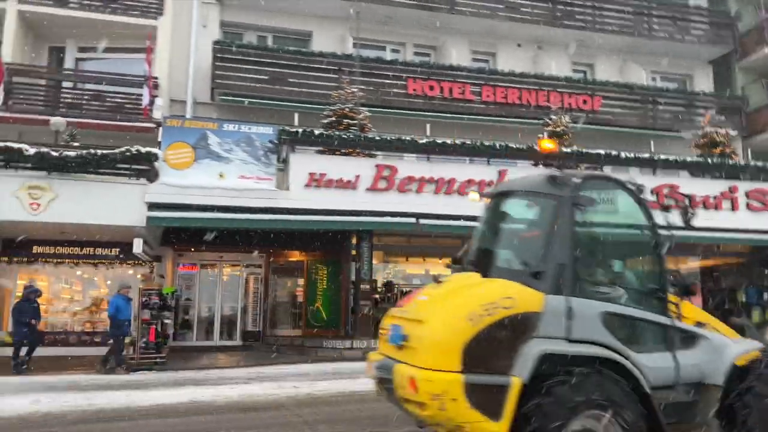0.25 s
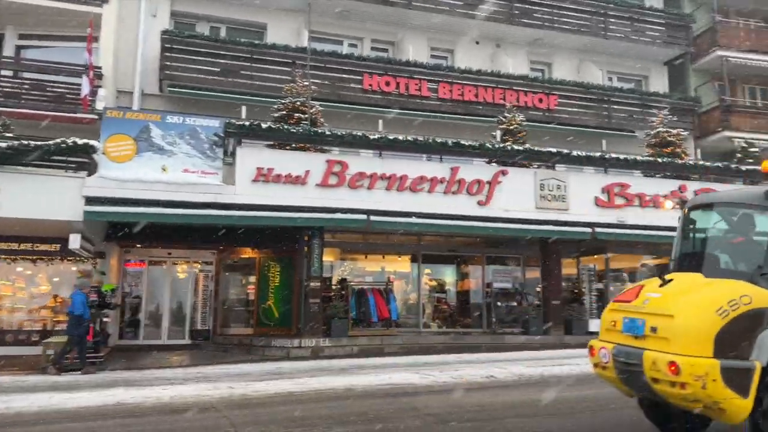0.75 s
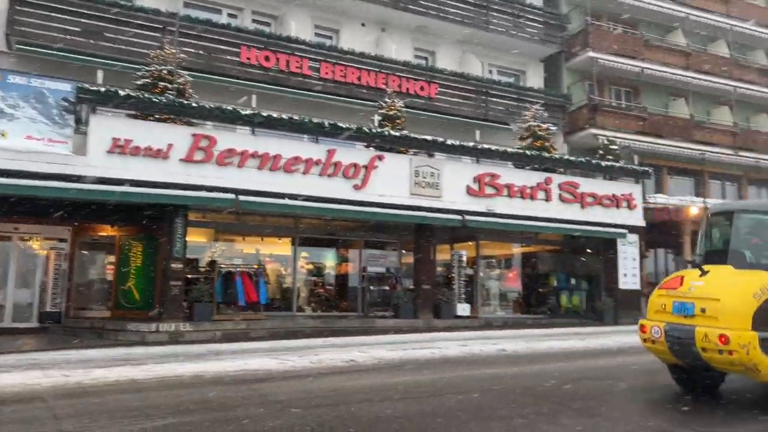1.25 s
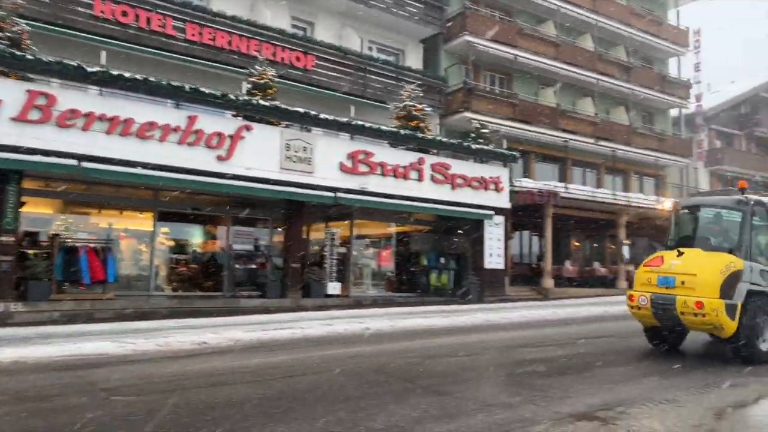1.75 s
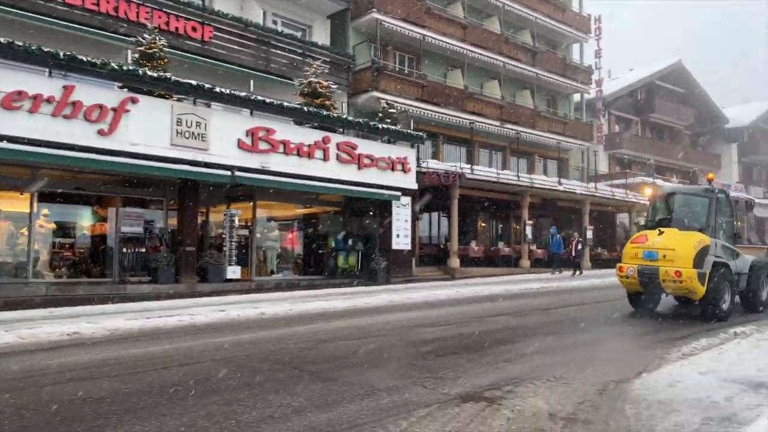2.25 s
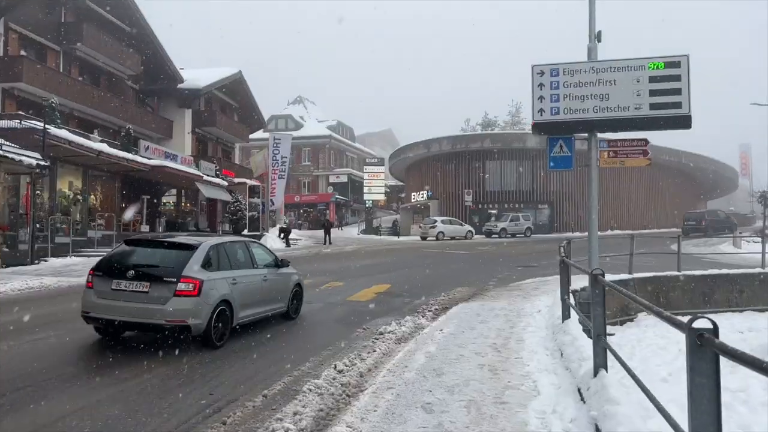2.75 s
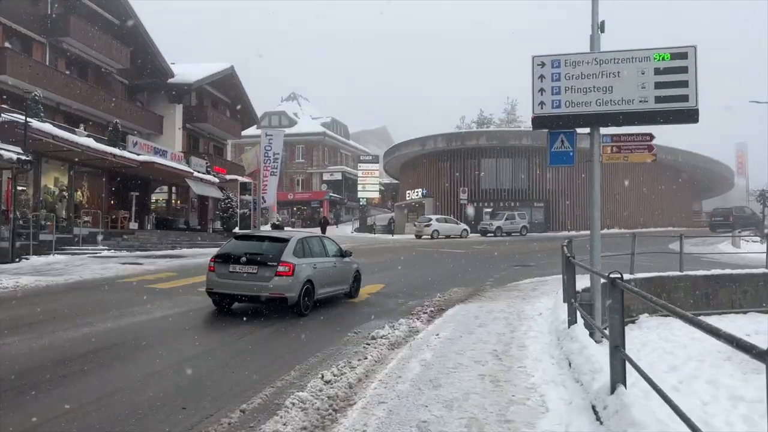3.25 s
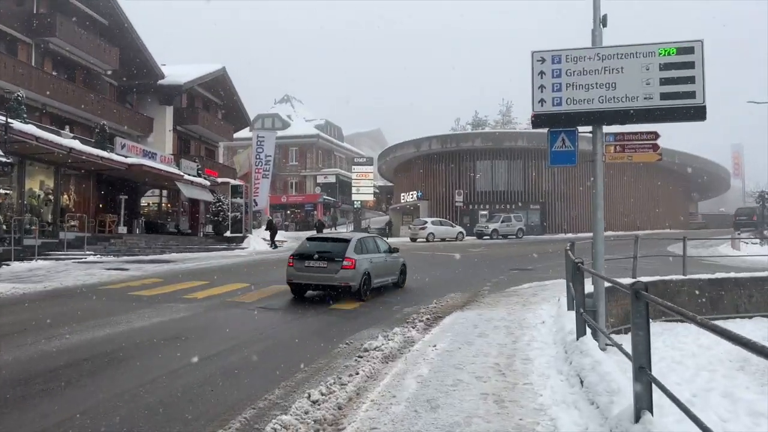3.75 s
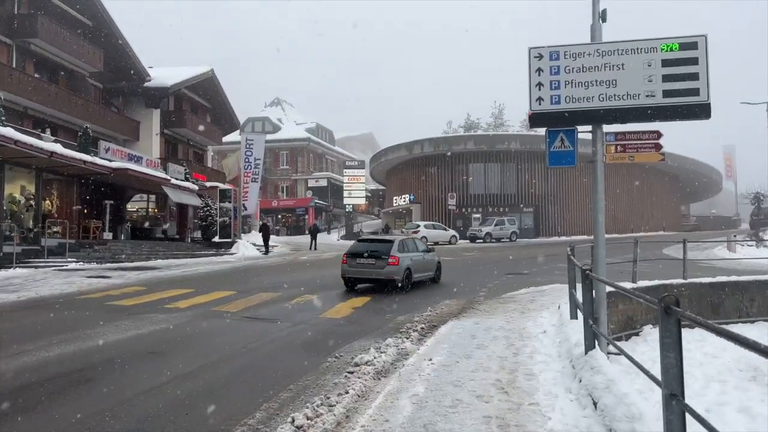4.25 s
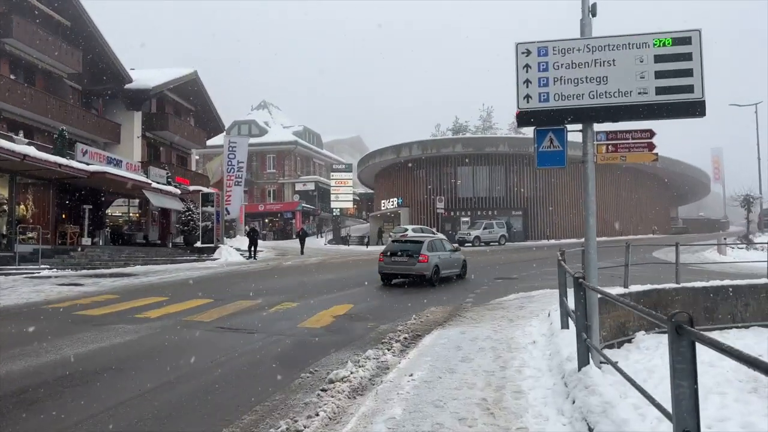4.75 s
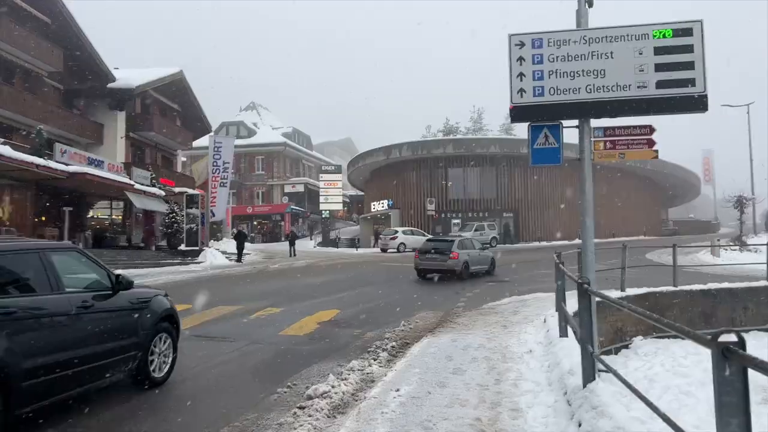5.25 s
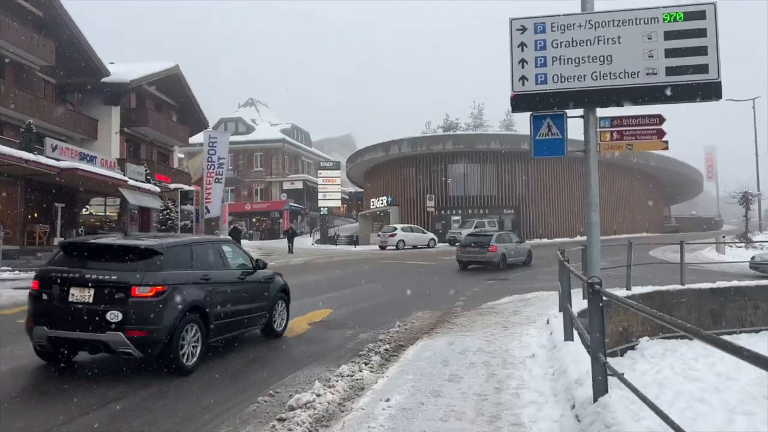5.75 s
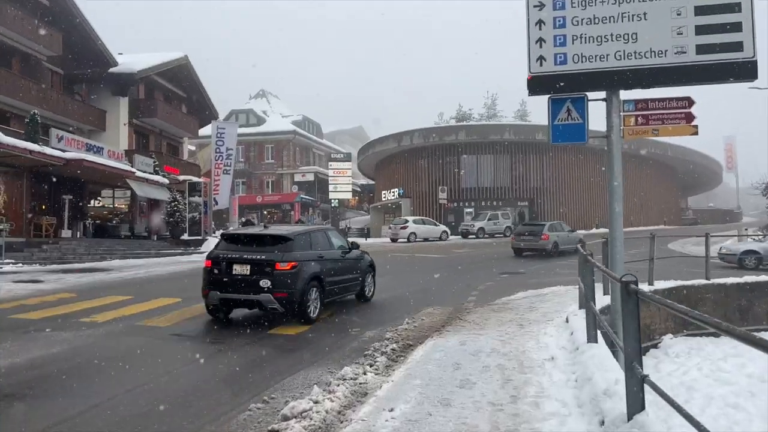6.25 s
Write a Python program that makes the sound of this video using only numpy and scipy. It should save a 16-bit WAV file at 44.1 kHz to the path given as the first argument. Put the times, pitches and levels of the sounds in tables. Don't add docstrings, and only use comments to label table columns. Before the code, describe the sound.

On a wet, slushy town street, a small diesel loader rolls past close to the microphone, with a steady low firing drone, rough casing roar, clatter and a thin high whistle, drawing off to the right. The scene cuts abruptly: one car moves away while another comes from the left, its tyres rushing and spraying over the wet road. A low diesel drone and far traffic rumble stay underneath. Handheld stereo phone at the kerb.

```python
import sys
import numpy as np
from scipy import signal
from scipy.io import wavfile
from scipy.ndimage import uniform_filter1d, map_coordinates

SR = 44100
rng = np.random.default_rng(int(sys.argv[2]) if len(sys.argv) > 2 else 0)


def linear_from_db(decibels):
    return 10 ** (np.asarray(decibels, float) / 20)


def generate_wav(signal):
    frames = np.transpose(np.atleast_2d(signal))
    scaled = np.clip(frames, -1, 1) * 32767
    pcm = np.round(scaled).astype(np.int16)
    wavfile.write(sys.argv[1], SR, pcm)


N = 285768
TIME = np.arange(N) / SR
CUT_S = 2.3235


def unit(x):
    return x / np.sqrt(np.mean(x ** 2) + 1e-20)


def curves(rows, t=TIME):
    s, *cols = np.transpose(rows)
    return [np.interp(t, s, c) for c in cols]


def along(points, hz):
    f, *cols = np.transpose(points)
    return [np.interp(np.log(hz + 1), np.log(f + 1), c) for c in cols]


def wobble(rate):
    knots = rng.standard_normal(int(N * rate / SR) + 4)
    return map_coordinates(knots, [TIME * rate])


# frequency in Hz, share kept of the path difference [0-1].
DIRECTION_KEPT = [(250, 0), (600, 1), (4800, 0.97), (6200, 0.028)]


def rush(spectrum, ports, lag, patchy_db, excite=1, size=512, blur=0 * TIME):
    hz, t, z = signal.stft(rng.standard_normal((3, N)) * excite, SR, nperseg=size)
    patches = uniform_filter1d(rng.standard_normal(z.shape[1:]), size=6, axis=0)
    patches = unit(uniform_filter1d(patches, size=12, axis=1))
    lean_db, turn, alike = (c[:, None] for c in along(ports, hz))
    kept = along(DIRECTION_KEPT, hz)[0]
    alike = np.clip(alike * (1 - kept[:, None] * np.interp(t, TIME, blur)), 0, 1)
    travel = 2 * np.pi * (hz * kept)[:, None] * np.interp(t, TIME, lag) / SR
    half = np.exp(.5j * (turn - travel))
    shared = np.array([half, 1 / half]) * z[2]
    pair = np.sqrt(alike) * shared + np.sqrt(1 - alike) * z[:2]
    pair = pair * linear_from_db(np.array([lean_db, -lean_db]) / 2)
    colour = linear_from_db(along(spectrum, hz)[0][:, None] + patchy_db * patches)
    return unit(signal.istft(pair * colour, SR, nperseg=size)[1][:, :N])


# time in seconds, level in dB, second order in dB.
FIRING_TONE = [
    [(0.0, -28, -36.5), (0.2, -26.5, -51), (0.4, -26.5, -56), (0.6, -27, -36), (0.8, -29, -38),
     (1.0, -28.5, -40.3), (1.2, -29.6, -38.0), (1.4, -27, -39), (1.6, -28.5, -40.5), (1.8, -27, -37.2),
     (2.0, -29.5, -37.5), (2.12, -31.7, -35.5), (2.22, -33.5, -42.9), (2.32, -32.5, -50)],
    [(2.33, -20.5, -46), (2.4, -22, -41), (2.5, -27, -42), (2.65, -24, -39), (2.8, -26, -41),
     (2.95, -27.5, -40), (3.1, -25.5, -46), (3.25, -27.5, -41), (3.4, -25.5, -55.0), (3.55, -25, -40),
     (3.7, -25.5, -43), (3.85, -25.0, -48.5), (4.0, -26.5, -43), (4.15, -23.5, -47), (4.3, -25.4, -37),
     (4.45, -24, -39.1), (4.6, -31, -39), (4.75, -31, -49), (4.9, -34, -56), (5.05, -37, -40),
     (5.2, -42.5, -40.9), (5.35, -39.7, -43), (5.5, -36.5, -41.5), (5.65, -36.5, -39.5), (5.8, -38, -38),
     (5.95, -31.9, -38), (6.1, -31.5, -41), (6.25, -34, -43.1), (6.4, -29, -44), (6.48, -34.5, -48.0)],
]
# time in seconds, order 4.5 of firing in dB, order 9 in dB.
PUMP_LINES = [(0, -28.5, -51), (.25, -45, -52), (.5, -37, -52), (.7, -49.5, -51), (1.2, -47.5, -55),
              (1.4, -40, -56.5), (1.8, -46, -54), (2.1, -50, -64), (2.6, -47.5, -61), (3.4, -46.5, -65),
              (3.8, -43, -62), (4.1, -49.5, -63), (5, -49, -62), (5.8, -50.5, -65), (6.2, -47, -62),
              (6.48, -46, -64)]


def diesel():
    firing_hz = 71.75
    first_db, second_db = np.where(TIME < CUT_S, curves(FIRING_TONE[0]), curves(FIRING_TONE[1]))
    phase = 2 * np.pi * firing_hz * TIME + .25 * wobble(5) + .12 * wobble(25)
    tone = linear_from_db(first_db + 0.58 * wobble(20)) * np.sin(phase)
    second_level = linear_from_db(second_db + 2.0 * wobble(15))
    tone = tone + second_level * np.sin(2 * phase + 1.2 + 0.18 * wobble(12))
    for order, line_db in zip((4.5, 9), curves(PUMP_LINES)):
        level = linear_from_db(line_db + 1.5 * wobble(9))
        tone = tone + level * np.sin(order * phase + 0.46 * wobble(12))
    return np.sqrt(2) * tone, phase


# time in seconds, casing in dB, clatter in dB, turbo whistle in dB.
LOADER_PASS = [(0.0, -26, -27.5, -31), (0.2, -27.5, -30, -28.5), (0.4, -27, -30.5, -32.5),
               (0.6, -27.5, -30.5, -37.5), (0.8, -29, -32, -32.5), (1.0, -28.5, -33, -45.5),
               (1.2, -29.5, -33, -39), (1.4, -31, -34.5, -37.5), (1.6, -32.5, -34, -42.5),
               (1.8, -32.5, -35.5, -38.5), (2.0, -33, -34.5, -43.5), (2.15, -34, -36, -43.5),
               (2.25, -36, -36.5, -38), (2.32, -33, -36.5, -38.5)]
# time in seconds, samples by which left lags.
LOADER_LAG = [
    (0, 1.5),
    (.3, 1.5),
    (.7, 5.5),
    (1.5, 6),
    (2.32, 6),
]
# frequency in Hz, level in dB per Hz.
CASING_HZ = [(120, 1), (200, -2), (360, -2.5), (440, 2), (520, -3.5), (600, -4), (830, -5.5), (1000, -4),
             (1500, -13), (2500, -43)]
# frequency in Hz, level in dB per Hz.
CLATTER_HZ = [(700, -25), (1300, 0), (1900, -1), (2800, -4.5), (4000, -7), (5500, -7.5), (8500, -8),
              (9700, -10.5), (10400, -8), (11500, -9.5), (11900, -62)]
# frequency in Hz, level in dB per Hz.
TURBO_HZ = [(9000, -19), (9900, -7.5), (10400, -1.5), (10900, 10), (11300, 6), (11700, -15.5), (11900, -60)]
# frequency in Hz, level in dB per Hz.
GEARS_HZ = [(720, -38.5), (795, -6), (822, 5.5), (850, -5), (930, -41.5)]
# frequency in Hz, left-right in dB, phase of left in rad, likeness [0-1].
LOADER_AT_PORTS = [(224, -3, 1.5, 1), (332, 0, 0.1, 0.45), (481, -3, -1.2, 0.77), (690, -11.5, -2, .55),
                   (880, -12, 0.9, .45), (1320, -5.5, -1, .6), (1880, -3, 0.5, 0.51),
                   (2910, -4.5, -0.45, 0.6), (3550, -2.5, 0.2, .6), (4540, -1.5, 0.5, .55),
                   (5470, -1, -1.5, 0.9), (6330, -3.5, -1.5, 0.9), (6950, -3, 1, 0.72),
                   (8460, 2.5, 1, 0.37), (9110, -4, -3, 0.92), (10010, -2, -3.5, .9), (11340, 2, -3, .75)]


def loader(phase):
    casing_db, clatter_db, turbo_db = curves(LOADER_PASS)
    lag, = curves(LOADER_LAG)

    def firing(depth):
        return 1 + depth * np.cos(phase + 0.98) * linear_from_db(2.8 * wobble(29.9))

    def noise(spectrum, patchy_db, **how):
        return rush(spectrum, LOADER_AT_PORTS, lag, patchy_db, **how)

    casing = linear_from_db(casing_db) * noise(CASING_HZ, 1.5, excite=firing(0.13))
    clatter = linear_from_db(clatter_db) * noise(CLATTER_HZ, 2.0, excite=firing(0.086))
    turbo = linear_from_db(turbo_db + 4.2 * wobble(25)) * noise(TURBO_HZ, 1.5, excite=firing(0.074))
    gears = linear_from_db(-40 - 1.1 * TIME + 2.0 * wobble(4)) * noise(GEARS_HZ, 1.0, size=2048)
    return (casing + gears + clatter + turbo) * (TIME < CUT_S)


# time in seconds, level in dB.
FAR_TRAFFIC = [
    [(0, -33), (.5, -36.5), (1, -37), (1.5, -41), (2.1, -38), (2.32, -44)],
    [(2.33, -32), (2.6, -34), (3, -34), (3.4, -35), (3.8, -36), (4.2, -33.5), (4.6, -33.5), (5, -34),
     (5.4, -34), (5.8, -35.5), (6.2, -36), (6.48, -36)],
]
# frequency in Hz, level in dB per Hz.
RUMBLE_HZ = [(15, -21.5), (30, -7.5), (55, -4), (100, 0), (200, -2), (330, -4), (480, -4.5), (800, -16.5),
             (2000, -28.5), (6000, -17), (11900, -62)]
# frequency in Hz, left-right in dB, phase of left in rad,
# likeness [0-1].
ROAD_AT_PORTS = [(219, 0, 0, 0.98), (333, 0.5, 0.5, 0.76), (483, -2, 0.5, .4), (922, -2, 0, .75),
                 (1398, -2.5, -0.49, .88), (1920, -2.5, 0, 0.85), (2780, -3, 0, .7), (3560, -1, .5, 0.67),
                 (4360, 0, 0, .5), (5560, 4.5, 0.5, 0.27), (7200, 0, 0.5, 0.57), (8580, 1, 0, 0.62),
                 (8970, -0.5, -3.5, .96), (11600, 1.5, -2.5, .93)]


def street():
    level_db = np.where(TIME < CUT_S, curves(FAR_TRAFFIC[0])[0], curves(FAR_TRAFFIC[1])[0])
    return linear_from_db(level_db) * rush(RUMBLE_HZ, ROAD_AT_PORTS, 0 * TIME, patchy_db=0.8, size=2048)


# time in seconds, tyre level in dB, left lag in samples.
LEAVING_CAR = [(2.33, -28, -8.5), (2.6, -28.5, -7.5), (2.9, -30, -6), (3.2, -31, -6), (3.5, -31.5, -4),
               (4, -36, -4.5), (5, -32, -2), (6.48, -40, -2.5)]
# frequency in Hz, level in dB per Hz.
WET_TYRES_HZ = [(400, -14), (700, -4.5), (900, 0.5), (1300, -2.5), (1900, 0.5), (2800, 0.5), (4000, -4.5),
                (5500, -7.5), (7000, -13), (9700, -11), (11500, -19), (11900, -70)]
# time in seconds, tread roar in dB, spray in dB, left lag in samples.
COMING_CAR = [(2.33, -45.5, -43.5, -24), (3, -36.5, -43.5, -20), (3.4, -38.5, -37, -17),
              (3.7, -31, -30, -18), (4, -31, -29, -19), (4.3, -27, -26.5, -17.5), (4.5, -30, -26, -16.5),
              (4.7, -29, -26, -14.5), (4.9, -28.5, -27, -14.5), (5.1, -27.5, -27.5, -12),
              (5.3, -31, -29.5, -11.5), (5.5, -28.5, -29.5, -11), (5.7, -29.5, -29.5, -5.5),
              (5.9, -32.5, -32.5, -3.5), (6.1, -32.5, -33.5, -5.5), (6.3, -33, -33.5, -2),
              (6.48, -35, -33.5, -3.5)]
# frequency in Hz, level in dB per Hz.
TREAD_HZ = [(400, -27), (700, -4), (950, -1.5), (1300, 2.5), (1900, -7), (2800, -16.5), (5000, -46.5)]
# frequency in Hz, level in dB per Hz.
SPRAY_HZ = [(900, -28.5), (1900, -3), (2800, 1.5), (4000, -1.5), (5500, -5.5), (7000, -10.5), (8500, -12),
            (9500, -14.5), (10800, -12.5), (11500, -20.5), (11900, -73)]
# time in seconds, share heard off the house fronts [0-1].
HOUSE_ECHO = [(2.33, .2), (3.9, 0.21), (4.2, .05), (4.6, 0.0018), (4.8, .1), (5.1, .3), (5.7, .4),
              (6, 0.11), (6.48, 0.21)]
# time in seconds, level in dB.
KERB_SLUSH = [
    (2.33, -58),
    (3.2, -50),
    (3.45, -42),
    (3.7, -38.5),
    (4, -37.5),
    (4.3, -42.5),
    (4.7, -50),
    (6.48, -61.5),
]
# frequency in Hz, level in dB per Hz.
SLUSH_HZ = [(4000, -31.5), (5200, -4), (6300, 0), (7500, -5.5), (9000, -13.5), (10000, -40)]
# frequency in Hz, left-right in dB, phase of left in rad, likeness [0-1].
KERB_AT_PORTS = [(3980, 10.5, 0.034, 0.1), (7000, 9.5, 0.026, .3), (9000, 3, 0.016, 0)]


def cars():
    leaving_db, leaving_lag = curves(LEAVING_CAR)
    tread_db, spray_db, lag = curves(COMING_CAR)
    echo, = curves(HOUSE_ECHO)
    slush_db, = curves(KERB_SLUSH)

    def drops(size_db):
        return linear_from_db(size_db * wobble(700) + 0.34 * wobble(9))

    first = rush(WET_TYRES_HZ, ROAD_AT_PORTS, leaving_lag, patchy_db=2.3, excite=drops(1.06))
    tread = rush(TREAD_HZ, ROAD_AT_PORTS, lag, patchy_db=1.7, excite=drops(1.0), blur=echo)
    spray = rush(SPRAY_HZ, ROAD_AT_PORTS, lag, patchy_db=1.75, excite=drops(1.35), blur=echo)
    slush = rush(SLUSH_HZ, KERB_AT_PORTS, lag, patchy_db=1.5, excite=drops(1.2))
    tyres = linear_from_db(leaving_db) * first + linear_from_db(tread_db) * tread + linear_from_db(spray_db) * spray
    return (tyres + linear_from_db(slush_db) * slush) * (TIME >= CUT_S)


# time in seconds, firing rate in Hz, level in dB.
LEAVING_ENGINE = [(2.33, 49, -42), (2.6, 49.9, -42), (2.8, 49.84, -40), (2.95, 51.8, -27.5),
                  (3.1, 50.75, -34.5), (3.25, 51.3, -37), (3.4, 51.06, -33), (3.6, 50.6, -35),
                  (3.8, 51.27, -30.5), (4.05, 51.15, -26), (4.3, 51.95, -37), (4.6, 52.2, -34),
                  (4.9, 53, -34.5), (5.3, 52.5, -39), (5.6, 53, -38), (5.9, 53.75, -29.5),
                  (6.2, 54.66, -34), (6.48, 53.8, -37)]
# time in seconds, third order in dB.
LOAD_GROWL = [(2.33, -54), (3.1, -52), (3.25, -37.5), (3.45, -40), (3.7, -47), (4.2, -47), (4.6, -56),
              (6.48, -65)]
# time in seconds, firing rate in Hz, level in dB, second order in dB,
# exhaust boom in dB.
COMING_ENGINE = [(2.33, 54.7, -62, -60, -56), (3.5, 54, -47, -59, -48), (3.9, 54.35, -34, -42, -44),
                 (4.15, 54.2, -41.5, -40.5, -49), (4.3, 52.8, -44, -39, -41), (4.45, 53.85, -47, -40, -48),
                 (4.6, 54.95, -41, -42, -34), (4.75, 55.2, -34, -36.5, -42), (4.9, 55.9, -40, -34, -33.5),
                 (5.05, 56.6, -36, -39.5, -32.5), (5.25, 57.4, -34, -34.5, -30),
                 (5.4, 57.6, -42, -36.5, -41), (5.6, 58.2, -37.5, -38.5, -41), (5.8, 58.3, -34, -38, -36.5),
                 (6, 58.6, -40, -39, -47), (6.2, 59.1, -36, -37, -37.5), (6.48, 58.2, -34.5, -42, -48.5)]
# frequency in Hz, level in dB per Hz.
BOOM_HZ = [(150, -38), (190, -0.5), (207, 0), (222, -0.5), (270, -38)]


def engines():
    hz, first_db = curves(LEAVING_ENGINE)
    growl_db, = curves(LOAD_GROWL)
    phase = 2 * np.pi * np.cumsum(hz) / SR + 0.17 * wobble(11)
    first = linear_from_db(first_db + 1.2 * wobble(16)) * np.sin(phase) + linear_from_db(growl_db) * np.sin(3 * phase)
    hz, low_db, high_db, boom_db = curves(COMING_ENGINE)
    phase = 2 * np.pi * np.cumsum(hz) / SR + 0.15 * wobble(10)
    second = linear_from_db(low_db + 3.2 * wobble(21)) * np.sin(phase)
    second = second + linear_from_db(high_db + 1.3 * wobble(14)) * np.sin(2 * phase)
    boom = linear_from_db(boom_db) * rush(BOOM_HZ, ROAD_AT_PORTS, 0 * TIME, patchy_db=-1.3, size=4096)
    return (np.sqrt(2) * (first + second) + boom) * (TIME >= CUT_S)


def scene():
    tone, phase = diesel()
    return tone + loader(phase) + street() + cars() + engines()


def roll_off(x):
    return signal.sosfilt(signal.butter(12, 13080, fs=SR, output="sos"), x)


def record(dry):
    return roll_off(dry)


dry = scene()
out = record(dry)
generate_wav(out)
```